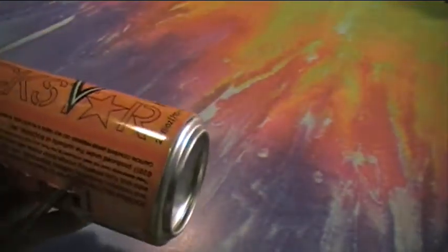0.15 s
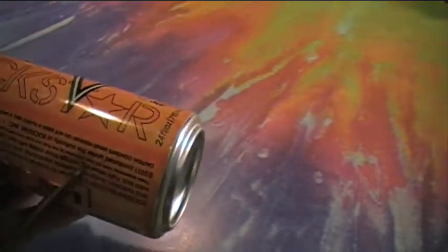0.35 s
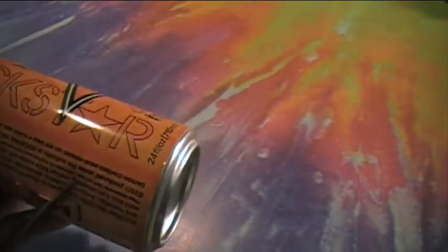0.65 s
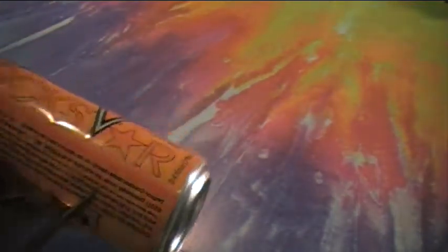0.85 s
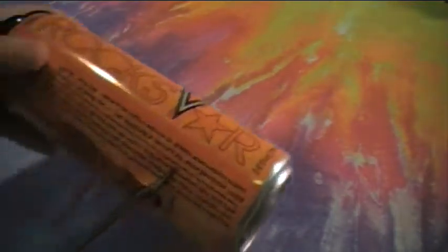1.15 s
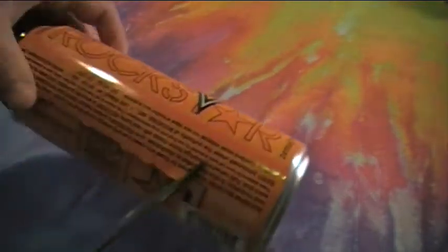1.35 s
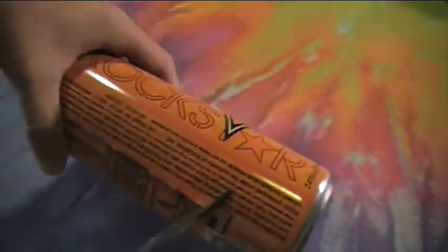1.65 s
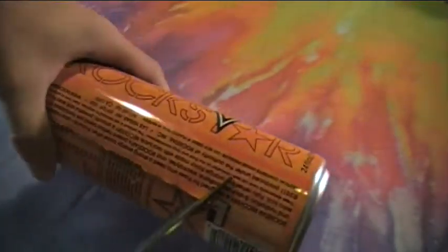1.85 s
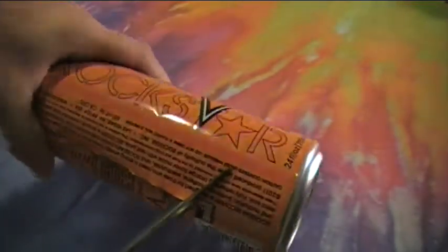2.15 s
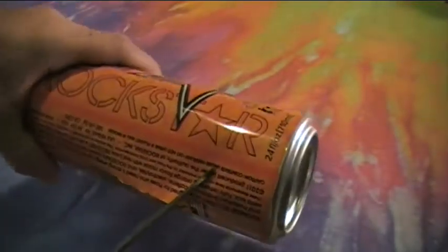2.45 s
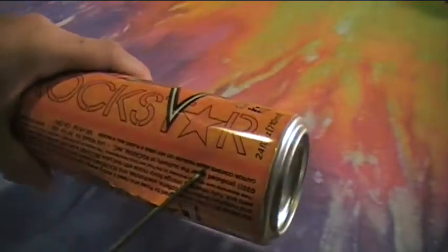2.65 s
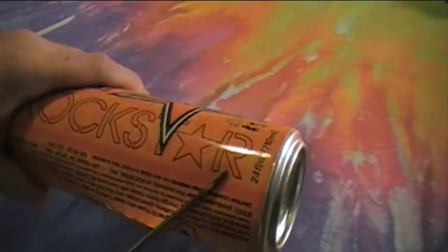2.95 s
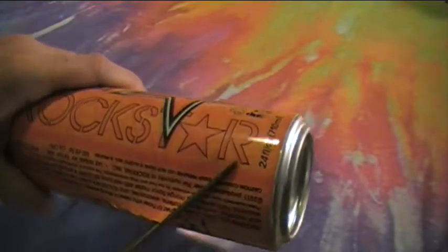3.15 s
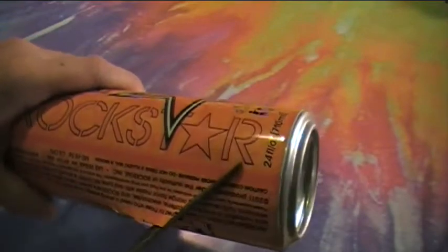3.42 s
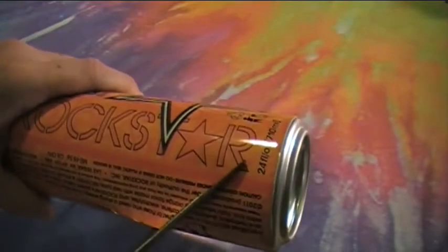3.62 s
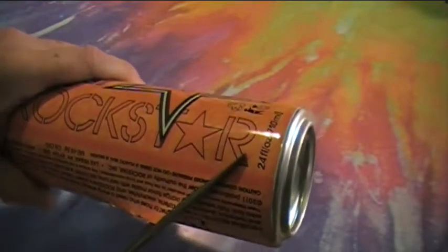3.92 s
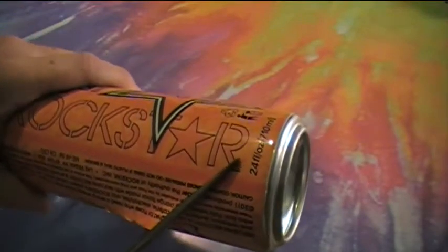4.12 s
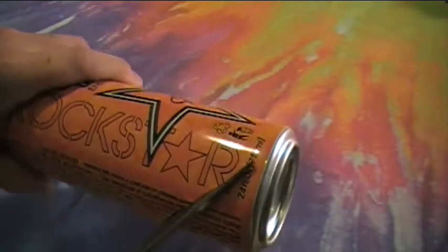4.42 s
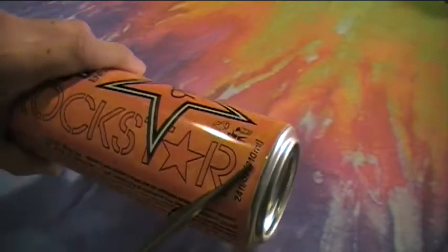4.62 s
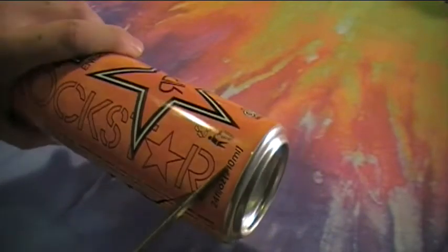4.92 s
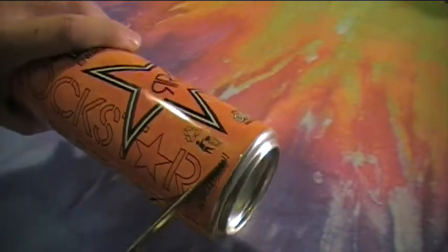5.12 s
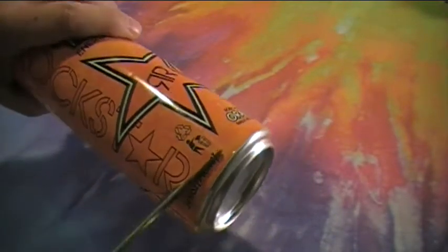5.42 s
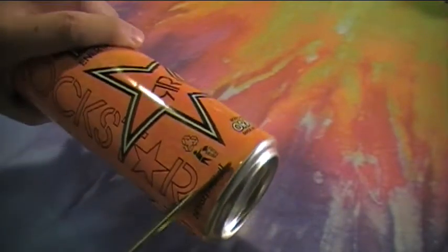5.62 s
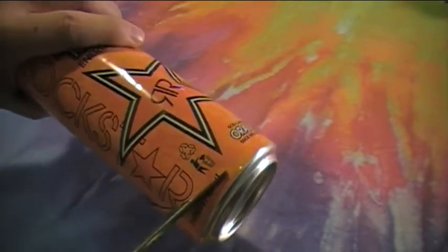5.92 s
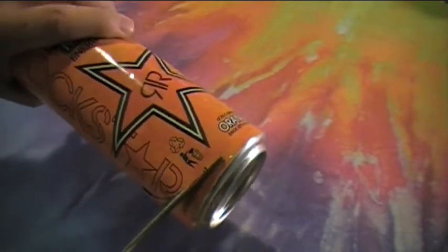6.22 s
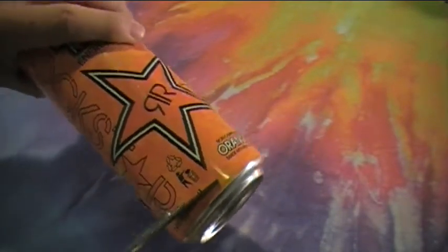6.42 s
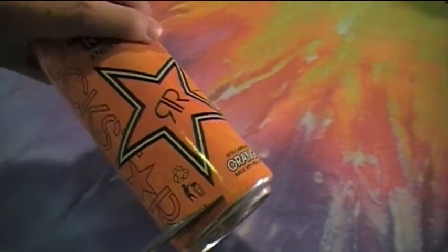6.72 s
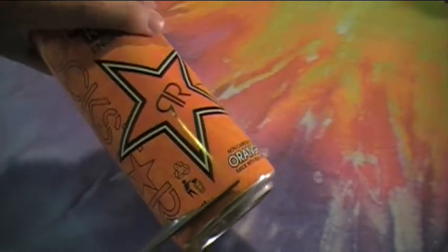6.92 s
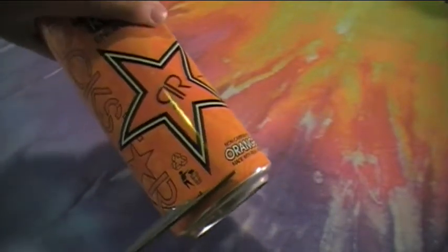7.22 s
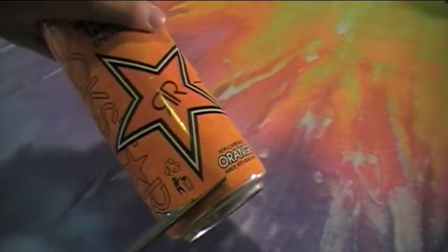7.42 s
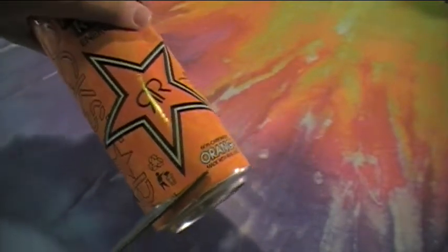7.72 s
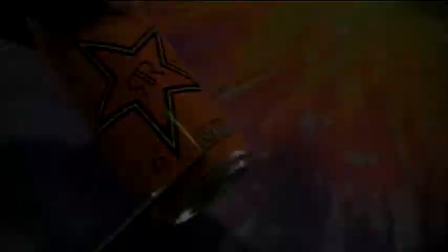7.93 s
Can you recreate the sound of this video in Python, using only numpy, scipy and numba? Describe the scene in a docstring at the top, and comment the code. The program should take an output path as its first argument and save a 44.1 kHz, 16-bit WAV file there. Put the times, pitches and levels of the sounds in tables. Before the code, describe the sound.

Scissors work around the wall of an empty aluminium can held close to the microphone. Sharp tinny snaps come first with a smooth scrape, then softer crinkles and hollow creaks, then a dense run of hard bright cracks with rasping cuts. Scattered snaps and small pings continue to the end. A small room adds a short tail over low rumble and faint hiss.

```python
"""Scissors cutting an aluminium can

Scissors work along the wall of an empty can, held in one hand close to a microphone.
The thin wall snaps in sharp cracks, made of clicks and short noise passed through the can's ringing modes.
Between them the blades shear, bend and slide (shaped noise); freed panels ping and stressed ones groan (tones).
A small room answers with a fading noise tail, over rumble, hiss and a soft hum of thin tones."""
import sys
import numpy as np
from scipy import signal
from scipy.fft import rfft, irfft, next_fast_len
from scipy.io import wavfile
from scipy.ndimage import uniform_filter1d
from numba import njit

SR = 44100
rng = np.random.default_rng(int(sys.argv[2]) if len(sys.argv) > 2 else 0)


def unload_wav(signal):
    """Save mono or channel-first audio to the path in sys.argv[1] as 16-bit WAV at rate SR, clipped to [-1, 1]."""
    wavfile.write(
        sys.argv[1],
        SR,
        np.round(np.clip(np.atleast_2d(signal).T, -1, 1) * 32767).astype(np.int16),
    )


def gain_from_db(level_db):
    """Turn a decibel level (scalar or array-like) into a linear amplitude factor."""
    decades = np.asarray(level_db, float) / 20
    return 10 ** decades


N = 355798  # length in samples

# Steady background colour. Each row: frequency in Hz, relative level in dB per Hz.
BACKGROUND_COLOUR = [(25, -36.5), (60, -26), (110, -19), (176, -6), (290, -4), (350, -6.5), (410, -8),
                     (625, -8.5), (1270, -15), (2500, -19), (6000, -32.5), (7000, -26.5), (10500, -29.5),
                     (12500, -43.5), (16500, -52)]
# Thin tones of the hum. Each row: frequency in Hz, average level in dB rms.
HUM_TONES = [(292, -58.5), (409, -59), (214, -64), (438, -59), (5496, -73.5), (6950, -73), (10150, -79)]
# How alike the background is left and right. Each row: frequency in Hz, likeness from 0 to 1.
LEFT_RIGHT_LIKENESS = [(60, 0.4), (250, 0.92), (1400, 0.4), (15000, 0.3)]
# Tilt of the background to one side. Each row: frequency in Hz, left minus right in dB.
BACKGROUND_LEAN = [(110, 3), (220, 0)]
# How long the room rings. Each row: frequency in Hz, time to fall by 60 dB in seconds.
ROOM_DECAY = [(200, 0.29), (1500, 0.35), (5000, 0.31), (12000, 0.1)]
# Two microphone ports hear the wall differently. Each row: frequency in Hz, side minus mid in dB.
PORT_SPREAD = [(300, -32), (1000, -23.5), (4000, -25.5), (8000, -6.5), (15000, -11)]
# Ringing modes of the can wall. Each row: frequency in Hz, width in Hz before damping, level in dB.
WALL_MODES = [(406, 2.3, -1.5), (420, 9.5, -2), (463.6, 17, 3), (592, 167, -14), (784, 6.9, -3),
              (1090, 50, -7.5), (1364, 72, -9), (1898, 84, -8.5), (2930, 91, -11.5), (3520, 44, -12.5),
              (4730, 30, -13.5), (5580, 27, -8.5), (7220, 44, -10.5), (7620, 140, -13), (8400, 67, -0.5),
              (8800, 61, -3.5), (9250, 90, -20), (9900, 230, -29)]
# Broad radiation of the sheet between the modes. Each row: frequency in Hz, level in dB before an offset.
SHEET_RADIATION = [(150, -23), (300, -9.5), (1000, -11), (3000, -12.5), (8000, -13), (12000, -19),
                   (16500, -64)]
# The hand muffles the deepest modes as the can turns; strokes feel half of it.
# Each row: time in seconds, level near 380 Hz in dB.
HAND_GRIP = [(1.5, -15), (2.5, -2), (4.6, -13), (5.3, -14.5), (8.1, -14)]
# A blade sliding smoothly along the wall. Each row: start, rise and hold in seconds, hiss level in dB.
SLIDE_STROKES = [(0.697, 0.067, 0.28, -39.5), (1.084, 0.15, 0.046, -42), (1.312, 0.14, 0.051, -40),
                 (4.389, 0.028, 0.41, -34.5), (6.149, 0.076, 0.037, -44.5), (7.036, 0.049, 0.025, -50.5),
                 (7.188, .03, 0.042, -45), (7.665, .02, 0.058, -48.5)]
# A stressed panel groaning: a gliding tone with irregular flutter.
# Each row: start, rise and hold in seconds, level in dB, first pitch in Hz, last pitch in Hz.
PANEL_GROANS = [(3.087, 0.023, 0.029, -36.5, 520, 693), (5.425, 0.022, 0.035, -32, 781, 807),
                (5.487, 0.007, 0.015, -35, 688, 754)]
# A freed panel ringing on at one pitch.
# Each row: start in seconds, pitch in Hz, starting level in dB, time to fall by 60 dB in seconds.
PANEL_PINGS = [(0.002, 1330, -19, 0.074), (0.004, 872, -25.5, 0.11), (0.001, 1910, -17, 0.033),
               (0.156, 406, -12, 0.022), (0.305, 1894, -26.5, 0.076), (1.189, 3670, -9.5, .055),
               (1.189, 9170, -9, 0.034), (1.043, 2315, -23, 0.065), (1.044, 766, -25.5, 0.073),
               (1.815, 1850, -18.5, 0.076), (1.813, 470, -20, 0.063), (1.917, 2890, -23, 0.079),
               (1.916, 1310, -16, 0.047), (1.964, 1435, -15, .04), (1.972, 470, -20, 0.076),
               (2.22, 614, -16.5, 0.034), (2.242, 1904, -19, 0.098), (2.389, 790, -17.5, 0.05),
               (2.587, 420, -9, 0.057), (3.009, 552, -20, 0.05), (3.024, 530, -22, .04),
               (3.297, 420, -15, 0.089), (5.679, 1037, -17.5, 0.14), (5.684, 1510, -23, 0.1),
               (5.688, 507, -18, 0.069), (5.762, 1073, -19, 0.084), (6.375, 2940, -20, 0.063),
               (6.438, 2915, -18, .07), (7.194, 1260, -6.5, 0.017), (7.659, 540, -5.5, 0.046),
               (7.659, 805, -9.5, 0.089)]
# Blades shearing the edge. Each row: start, rise and hold in seconds, level in dB, sizzle in dB.
SHEAR_STROKES = [(-.01, 0.014, 0.0047, -28.5, -7.5), (0.038, 0.029, 0.052, -45, -14),
                 (0.291, 0.0079, 0.011, -36, -17), (1.799, 0.0068, 0.0024, -29, -3),
                 (1.907, 0.0063, 0.0025, -26.5, -3.5), (1.951, 0.0075, 0.0038, -26, -3.5),
                 (2.031, 0.008, 0.0026, -37, -5.5), (2.253, 0.007, 0.039, -32.5, -32),
                 (2.746, 0.019, 0.044, -26, 5), (3.455, 0.008, 0.08, -34.5, 1),
                 (4.263, 0.026, 0.055, -21.5, 0), (5.034, 0.011, 0.065, -32.5, 0),
                 (5.103, 0.037, 0.077, -30, -1), (5.656, 0.022, 0.023, -32, -13),
                 (5.962, 0.03, 0.0043, -24, -4), (6.773, 0.024, 0.12, -26, -3.5),
                 (7.756, 0.021, 0.0033, -31.5, -6)]
# The wall bending under the blade.
# Each row: start, rise and hold in seconds, level in dB, creak pitch in Hz before its wander.
BEND_STROKES = [(2.31, 0.034, 0.099, -49.5, 750), (2.808, 0.0057, 0.017, -48, 507),
                (2.959, 0.039, 0.028, -50.5, 510), (3.058, 0.062, 0.035, -45.5, 610),
                (3.152, 0.022, 0.145, -51, 420), (3.402, 0.054, 0.047, -47, 438),
                (5.393, 0.069, 0.04, -44.5, 905), (5.677, 0.016, 0.06, -51, 1070),
                (6.868, 0.036, 0.03, -53, 734), (7.825, 0.085, 0.35, -55, 413)]
# Hollow creak of a shearing blade, before its wander. Each row: time in seconds, pitch in Hz.
CREAK_PITCH = [(0, 1170), (.3, 517), (1.82, 495), (1.91, 1230), (1.97, 614), (4.3, 490), (5.1, 910),
               (8, 854)]
# The 1-3 kHz body of a snap as the cut moves round the wall. Each row: time in seconds, level in dB.
SNAP_BODY = [(0, -2.5), (2.4, 2), (3.1, 1), (3.9, -2), (4.6, -3), (5.6, -5), (6.4, -3), (7.2, -2.5),
             (8, 2.5)]
# The wall snapping. Each row: start in seconds, level in dB, boom below 1 kHz in dB,
# sizzle above 6 kHz in dB, loudest ring in Hz.
WALL_SNAPS = [(0.161, -14, 5, -13, 368), (0.326, -8, -5, -27, 1800), (0.346, -20, -6, -17, 2020),
              (0.62, -34, 22.5, -7, 360), (0.647, 0, -4, -5.5, 2880), (0.651, 0.5, 2, -8, 2070),
              (0.69, 8.5, -8, -6, 2140), (1.041, -8, -6, -2, 1970), (1.049, -12.5, 2.5, -18, 1930),
              (1.188, -8, -43, 2.5, 3700), (1.459, -11.5, -10, -1, 9300), (1.816, -10.5, -17, -7, 1750),
              (1.917, -10, 1, -5, 2930), (2.151, -26, 3, -1.5, 1570), (2.22, -15, -4, -15, 2420),
              (2.24, -1, 1, -13.5, 596), (2.264, -20, -15, -0.5, 6500), (2.277, -11.5, -16, -6, 2340),
              (2.29, -16.5, 6.5, 2.5, 409.0), (2.337, -22.5, 10, -9.5, 5900), (2.378, -19.5, 5.5, -8, 5350),
              (2.389, -18, 7, -9.5, 1760), (2.36, -35, 0, -10, 2000), (2.315, -23, 4, -17, 2200),
              (2.418, -22, 6, -23, 1880), (2.584, -8, 8.5, -3.5, 1450), (2.844, -27, 15, -17, 474),
              (2.99, -30, 10, -9, 520), (3.009, -19, 11.5, -28, 2860), (3.024, -21.5, 11.5, -15, 2800),
              (3.048, -29, 13, -27, 2700), (3.068, -32.5, 18.5, -23, 490), (3.089, -21, 13.5, -7.5, 540),
              (3.127, -20.5, 11.5, -22, 2490), (3.141, -17, -8, -3, 2980), (3.185, -23, -14, -13, 2500),
              (3.196, -12, 1, -4.5, 1100), (3.223, -15, 4, 0.5, 1020), (3.234, -19.5, 2, -22, 1350),
              (3.254, -24.5, 3, -9, 1270), (3.27, -21, -4, -11.5, 4630), (3.295, -17.5, 3, 0, 423),
              (3.299, -9, -3, -6, 4080), (3.47, -5.5, -0.5, 3, 590), (3.86, -2.5, -21, 3.5, 7900),
              (3.888, -6.5, 6, -7, 1290), (3.934, -1, 3, -5.5, 2020), (4.11, -1.5, 2.5, -4.5, 420.0),
              (4.151, -7.5, 3.5, -6.5, 523), (4.36, 13.5, -16, -3, 7000), (4.504, 2.5, -15.5, -3.5, 9500),
              (4.579, -2.5, -11.5, 4, 8900), (4.615, -4, -16, -1, 7700), (4.635, 6.5, -11, -3.5, 8500),
              (4.669, 7.5, -14.5, -2, 7400), (4.76, 6, -10, -3, 6750), (4.816, -16.5, 6.5, -4.5, 480),
              (4.942, -5, -18, -9, 6450), (4.994, -17.5, 0, -0.5, 3080), (5.046, -9, -5, -11.5, 496),
              (5.113, -10, -5, -3, 1090.0), (5.19, -6, -6, -1.5, 1130), (5.622, -7.5, -4, -14, 3800),
              (5.637, -2, -4, -3.5, 9000), (5.645, 5, -9, -5.5, 7650), (5.683, -16, 13, -1.5, 1076),
              (5.763, -10, 8, -14.5, 1040), (5.994, -5.5, 5.5, 4.5, 1140), (6.304, -23, 11.5, -16, 1290),
              (6.321, -12, -6, -1.5, 8750), (6.373, -2, 9.5, -7, 1900), (6.436, -3, 9, -2.5, 1820),
              (6.501, -13, 9, -9.5, 1770), (6.579, -19, 4, -6.5, 1140), (6.6, -13.5, 4, -4, 466),
              (6.632, -25, 14.5, -10, 1300), (6.638, 5, -8, -7, 10000), (7.193, 3, 0.5, -6, 7430),
              (7.352, -26, 9.5, -13, 1370), (7.432, -2, 0.5, -7, 1070), (7.442, 6.5, -9.5, -9.5, 5150),
              (7.481, -20.5, 8, -18, 600), (7.576, 4, -8, -5.5, 4040), (7.658, 5.5, 0, -15.5, 1180),
              (7.711, -11.5, 8, -39, 920), (8.0, 1, -4, -7, 1090.0)]

QUIET_DB = -48.5
ROOM_DB, ROOM_WIDTH = -15.5, 0.55  # width: share of side against mid
CAN_LOW_HZ = 250
MIC_LOW_HZ, MIC_TOP_HZ, FULL_SCALE = 75, 14400, 0.87
RISE_FROM_DB = -21.5  # a stroke fades in from this far below its level
SLIDE_SAG_DB_S, SLIDE_RELEASE_DB_S, SLIDE_BODY_DB = 17.5, 185, 0.5
GROAN_RELEASE_DB_S, GROAN_FLUTTER_DB, GROAN_OCTAVE_DB = 700, 2.5, -22
PING_RISE_S = 0.00078
PING_BLUR_HZ = 70000  # pitch at which the blur would be as wide as the pitch
SHEAR_BOOM_DB, SHEAR_SAG_DB_S, SHEAR_RELEASE_DB_S = 1.5, 105, 517
BOOM_LINGERS = 0.22  # share of a shear's change in level that the boom does not follow
BEND_BOOM_DB, BEND_SIZZLE_DB, BEND_SAG_DB_S, BEND_RELEASE_DB_S = 13.5, -5, 37, 295.5
# snap body: slightly weaker for hard snaps, and weaker for small, high panels
BODY_DB_PER_PEAK_DB, BODY_DB_PER_OCTAVE = -0.01, -0.97
HARD_SNAP_DAMPING = 0.053  # hard snaps crease the wall: modes widen by these dB per dB of level above -10
RUSTLE_DB_PER_OCTAVE = -4  # the settling dent is duller than the crack


def on_log(hz, table):
    """Read a (Hz, value) table on a log-frequency axis."""
    f, v = np.transpose(table)
    return np.interp(np.log(np.maximum(hz, 1)), np.log(f), v)


def over_time(t, table):
    """Read a (seconds, value) table along straight lines."""
    return np.interp(t, *np.transpose(table))


def walk(rate):
    """Random wander: levels held 1 / rate seconds with smoothed steps; spread near 1."""
    k = int(SR / rate)
    held = np.repeat(rng.standard_normal(N // k + 1), k)
    return 1.3 * uniform_filter1d(held, k)[:N]


def resonance(hz, centre_hz, width):
    """One damped mode, gain 1 at its centre."""
    return 1j * hz * width / (centre_hz ** 2 - hz ** 2 + 1j * hz * width)


def shell(hz, detune, scatter_db, damping, sheet_db, crease=0):
    """Response of the can wall: its modes over the broad radiation of the sheet."""
    f, width, db = np.transpose(WALL_MODES)[:, :, None]
    wider = 1 + crease * (f / 1000) ** 2  # a crease soaks up the high modes first
    ringing = resonance(hz, f * detune[:, None], width * damping * wider)
    modes = gain_from_db(db + scatter_db[:, None]) * ringing / np.sqrt(wider)
    return modes.sum(axis=0) + gain_from_db(on_log(hz, SHEET_RADIATION) + sheet_db)


def steady_shell(hz, damping, sheet_db, crease):
    """The can wall with every mode at its own pitch and level."""
    return shell(hz, np.ones(len(WALL_MODES)), np.zeros(len(WALL_MODES)), damping, sheet_db, crease)


def through(x, response):
    """Pass a sound through a frequency response, keeping its length."""
    return signal.fftconvolve(x, np.fft.fftshift(irfft(response)), "same")


@njit
def sweep(x, hz, share):
    """Band-pass whose centre moves; width is a share of the centre."""
    y, b, l = np.empty(len(x)), 0., 0.
    for i in range(len(x)):
        g = np.tan(np.pi * hz[i] / SR)
        v = (b + g * (x[i] - l)) / (1 + g * (g + share))
        b, l, y[i] = 2 * v - b, l + 2 * g * v, share * v
    return y


def stroke_db(start, rise, hold, sag_db_s, release_db_s):
    """Rise, sagging hold and release of one stroke: its samples, dB under the top, and a soft first touch."""
    end = rise + hold + 40 / release_db_s
    span = np.arange(max(int(start * SR), 0), min(int((start + end) * SR), N))
    t = span / SR - start
    sagged_db = -sag_db_s * hold
    db = np.interp(t, [0, rise, rise + hold, end], [RISE_FROM_DB, 0, sagged_db, sagged_db - 40])
    return span, db, np.clip(t / 0.011, 0, 1)


def quiet():
    """Room rumble and hiss that breathe slightly, with a few thin wavering tones."""
    size = next_fast_len(N)
    hz = np.fft.rfftfreq(size, 1 / SR)
    alike = np.clip(on_log(hz, LEFT_RIGHT_LIKENESS), 0, 1)
    weights = np.sqrt([1 + alike, 1 - alike])
    noise = rfft(rng.standard_normal((2, size)))
    mid, side = noise * weights * gain_from_db(on_log(hz, BACKGROUND_COLOUR))
    lean_db = on_log(hz, BACKGROUND_LEAN) / 2
    left, right = (mid + side) * gain_from_db(lean_db), (mid - side) * gain_from_db(-lean_db)
    air = irfft(np.array([left, right]), size)[:, :N]
    air = air * gain_from_db(QUIET_DB + 0.61 * walk(3.16)) / air.std()
    tones = np.zeros(N)
    for f, db in HUM_TONES:
        level = np.sqrt(2) * gain_from_db(db + 0.74 * walk(28))
        cycles = f / SR * np.cumsum(1 + 0.3 / f * walk(4.1))  # pitch wavers by about 0.3 Hz
        tones += level * np.sin(2 * np.pi * cycles)
    return air + tones


def room(x, size=24576):
    """Diffuse tail of a small room, shorter in the treble, partly different left and right."""
    t, hz = np.arange(size) / SR, np.fft.rfftfreq(size, 1 / SR)
    tail = 0
    for centre in 125 * 2. ** np.arange(8):  # octave bands
        share = np.clip(1 - np.abs(np.log2(np.maximum(hz, 1) / centre)), 0, 1)
        band = irfft(rfft(rng.standard_normal((2, size))) * np.sqrt(share))
        tail = tail + band * gain_from_db(-60 * t / on_log(centre, ROOM_DECAY))
    tail = tail * np.clip(t / 0.0004, 0, 1)
    mid, side = tail / np.sqrt(np.sum(tail[0] ** 2))
    left_right = np.array([mid + ROOM_WIDTH * side, mid - ROOM_WIDTH * side])
    return signal.fftconvolve(x[None], left_right, axes=1)[:, :N]


def ports(x, size=2048):
    """Left and right ports: the difference is a smeared, coloured copy of the sound."""
    hz = np.fft.rfftfreq(size, 1 / SR)
    smear = rng.standard_normal(size) * np.exp(-np.arange(size) / SR / 0.00043)
    smear = np.roll(smear, 32) / np.sqrt(np.sum(smear ** 2))
    smear = irfft(rfft(smear) * gain_from_db(on_log(hz, PORT_SPREAD)))
    side = signal.oaconvolve(x, smear)[:N]
    return np.array([x + side, x - side])


def slides(size=8192):
    """Smooth friction hiss, radiated mostly by the high modes of the wall."""
    hz, gain = np.fft.rfftfreq(size, 1 / SR), np.zeros(N)
    wall = steady_shell(hz, 2.8, 3.4, 0.04)
    colour_db = [(800, SLIDE_BODY_DB - 9.5), (3000, SLIDE_BODY_DB), (7000, -0.5), (13000, -5)]
    friction = rng.standard_normal(N) * gain_from_db(0.47 * walk(34))
    hiss = through(friction, wall * gain_from_db(on_log(hz, colour_db)))
    for start, rise, hold, db in SLIDE_STROKES:
        span, shape_db, touch = stroke_db(start, rise, hold, SLIDE_SAG_DB_S, SLIDE_RELEASE_DB_S)
        gain[span] += touch * gain_from_db(db + shape_db)
    return gain * hiss / hiss.std()


def groans():
    """A fluttering tone with a weak octave that glides as the panel tightens."""
    out = np.zeros(N)
    flutter, waver = gain_from_db(GROAN_FLUTTER_DB * walk(120)), np.exp(0.047 * walk(120))
    for start, rise, hold, db, from_hz, to_hz in PANEL_GROANS:
        span, shape_db, touch = stroke_db(start, rise, hold, 0, GROAN_RELEASE_DB_S)
        hz = np.interp(span / SR - start, [0, rise + hold], [from_hz, to_hz]) * waver[span]
        phase = 2 * np.pi * np.cumsum(hz) / SR
        tone = np.sin(phase) + gain_from_db(GROAN_OCTAVE_DB) * np.sin(2 * phase)
        out[span] += np.sqrt(2) * tone * touch * flutter[span] * gain_from_db(db + shape_db)
    return out


def pings():
    """Each panel starts softly and dies away, throbbing as the dented wall shifts."""
    out, waver = np.zeros(N + SR), np.tile(walk(700), 2)
    for (s, hz, db, t60), turn in zip(PANEL_PINGS, rng.random(len(PANEL_PINGS))):
        t = np.arange(int(min(t60, 0.9) * SR)) / SR
        first = int(s * SR)
        span = slice(first, first + len(t))
        # high panels are clusters of close modes: their pitch is blurred
        blur = np.cumsum(waver[span]) / SR * hz / PING_BLUR_HZ
        tone = np.sin(2 * np.pi * (hz * (t + blur) + turn))
        out[span] += tone * (1 - np.exp(-t / PING_RISE_S)) * gain_from_db(db - 60 * t / t60)
    return out[:N] * gain_from_db(2 * walk(70))


def stroke_gains():
    """Blade pressure over time as gains for body, boom, sizzle, creak and crumple."""
    gain = np.zeros((5, N))
    shears = [(*row, SHEAR_BOOM_DB, BOOM_LINGERS, SHEAR_SAG_DB_S, SHEAR_RELEASE_DB_S)
              for row in SHEAR_STROKES]
    bends = [(*row[:4], BEND_SIZZLE_DB, BEND_BOOM_DB, 0, BEND_SAG_DB_S, BEND_RELEASE_DB_S)
             for row in BEND_STROKES]
    for start, rise, hold, level_db, sizzle_db, boom_db, lingers, sag, release in shears + bends:
        span, shape_db, touch = stroke_db(start, rise, hold, sag, release)
        boom_db = boom_db - lingers * shape_db
        # heavy, boomy pressure bends the wall: it creaks and crumples more
        creak_db, crumple_db = 1.76 * boom_db - 15.5, 0.75 * boom_db - 9
        for k, db in enumerate([0, boom_db + 2.5, sizzle_db, creak_db, crumple_db]):
            gain[k, span] += touch * gain_from_db(level_db + shape_db + db)
    return gain


def creaking(grains):
    """Hollow creak: the grains pass twice through a band-pass at a wandering pitch."""
    creak_hz = over_time(np.arange(N) / SR, CREAK_PITCH)
    for start, rise, hold, _, bend_hz in BEND_STROKES:
        span = stroke_db(start, rise, hold, BEND_SAG_DB_S, BEND_RELEASE_DB_S)[0]
        creak_hz[span] = bend_hz
    creak_hz = creak_hz * np.exp(0.14 * walk(40))
    return sweep(sweep(grains, creak_hz, 0.3), creak_hz, 0.3)


def denting():
    """Tiny dents give way at random, about 260 a second, each a tick of about 2 ms."""
    dents = (rng.random(N) < 260 / SR) * gain_from_db(17 * rng.random(N))
    return rng.standard_normal(N) * signal.lfilter([1], [1, -np.exp(-1 / (0.0016 * SR))], dents)


def strokes(size=8192):
    """Dense stick-slip grains under the blade drive the wall; pressure shifts boom, sizzle and creak."""
    t, hz = np.arange(N) / SR, np.fft.rfftfreq(size, 1 / SR)
    grains = rng.standard_normal(N) * gain_from_db(1.3 * walk(600) + 1.8 * walk(110))
    wall = steady_shell(hz, 0.91, 0.73, 0.015)
    low = 1 / (1 + (hz / 1200) ** 4)
    high = 1 / (1 + (5500 / np.maximum(hz, 1)) ** 4)
    body = through(grains, wall * (1 - low - high))
    boom = through(grains, wall * low)
    sizzle = through(grains, wall * high)
    creak = creaking(grains)
    crumple = through(denting(), wall * (1 - high - 0.5 * low))
    # the boom is evened out before the grip, so that the grip still changes its level
    gripped_boom = boom / boom.std() * gain_from_db(0.5 * over_time(t, HAND_GRIP))
    gain = stroke_gains()
    out = gain[1] * gripped_boom
    for g, layer in zip(gain[[0, 2, 3, 4]], (body, sizzle, creak, crumple)):
        out += g * layer / layer.std()
    return out


def snaps(size=4096, count=256):
    """Each buckle is a click and a few ms of rattle; the dented wall is tuned a little differently each time."""
    out, hz = np.zeros(N + size), np.fft.rfftfreq(size, 1 / SR)
    n = np.arange(size)
    t = np.maximum(n - count, 0) / SR
    fade = np.clip(np.minimum(n / 64, (size - n) / 1500), 0, 1)
    for s, peak_db, boom_db, sizzle_db, ring_hz in WALL_SNAPS:
        body_db = over_time(s, SNAP_BODY) + BODY_DB_PER_PEAK_DB * peak_db
        body_db += BODY_DB_PER_OCTAVE * np.log2(ring_hz / 1000)
        # big boomy dents roll over slowly, small bright ones crack at once
        slow = max(boom_db + 11.5, 0)
        rise, fall = 0.00032 * gain_from_db(0.46 * slow), 0.0031 * gain_from_db(0.26 * slow)  # s
        noise = rng.standard_normal(size) * np.minimum(t / rise, 1)
        rattle = noise * np.exp(-t / fall)
        rattle[count + 12] += 6.84 * 0.00031 / rise  # the click
        # a weaker rustle follows as the dent settles
        rustle = noise * gain_from_db(-17.0) * np.exp(-t / 0.041)
        rustle_tilt = gain_from_db(RUSTLE_DB_PER_OCTAVE * np.log2(np.maximum(hz, 300) / 1000))
        pitch_chance, level_chance = rng.standard_normal((2, len(WALL_MODES)))
        damping = 2.2 * gain_from_db(HARD_SNAP_DAMPING * max(peak_db + 10, 0))
        wall = shell(hz, 1 + 0.03 * pitch_chance, 3 * level_chance, damping, 3.0, 0.07)
        # the panel that flips rings out at first; high panels are small and well damped
        panel = resonance(hz, ring_hz, 20 + 0.22 * ring_hz) / (1 + ring_hz / 3000)
        grip_db = over_time(s, HAND_GRIP)
        colour_db = on_log(hz, [(380, boom_db + grip_db), (650, boom_db), (1800, body_db),
                                (4300, 0.0048), (8500, sizzle_db)])
        sound = rfft(rattle) * (wall + 2 * panel) + rfft(rustle) * wall * rustle_tilt
        start = int((s + 0.0006) * SR) - count
        out[start:start + size] += fade * irfft(sound * gain_from_db(colour_db + peak_db))
    return out[:N]


def scene():
    """The can sits a little left of the microphone; being small it radiates no deep bass."""
    background = quiet()
    can = slides() + groans() + pings() + strokes() + snaps()
    no_bass = signal.butter(2, CAN_LOW_HZ, "high", fs=SR, output="sos")
    can = signal.sosfilt(no_bass, can)
    direct = ports(can) * gain_from_db(np.array([[0.3], [-0.3]]))
    return background + gain_from_db(ROOM_DB) * room(can) + direct


def gain_control(loudness, top, slope, attack_s, release_s, size=64):
    """Gain that drops fast above a level and recovers slowly, worked out block by block."""
    blocks, e = uniform_filter1d(loudness, size)[::size], 0.
    follow = np.empty(len(blocks))
    for i, v in enumerate(blocks):
        e += (v - e) * min(size / SR / (attack_s if v > e else release_s), 1)
        follow[i] = e
    gain = (top / np.maximum(follow, top)) ** slope
    return np.interp(np.arange(N), np.arange(len(blocks)) * size, gain)


def low_pass(x):
    """Removes everything above the highest recorded frequency."""
    return signal.sosfilt(signal.butter(12, 16660, fs=SR, output="sos"), x)


def record(dry):
    """Gain control ducks after loud cracks, the loudest peaks are rounded, both ends are rolled off."""
    gain = gain_control(np.abs(dry).max(axis=0), gain_from_db(-37.0), 0.16, 0.0022, 0.46)
    ducked = dry * gain
    rounded = ducked / (1 + (ducked / FULL_SCALE) ** 4) ** (1 / 4)
    low_cut = signal.butter(2, MIC_LOW_HZ, "high", fs=SR, output="sos")
    high_cut = signal.butter(6, MIC_TOP_HZ, fs=SR, output="sos")
    finished = signal.sosfilt(high_cut, signal.sosfilt(low_cut, rounded))
    return low_pass(finished)


dry = scene()
out = record(dry)
unload_wav(out)
```